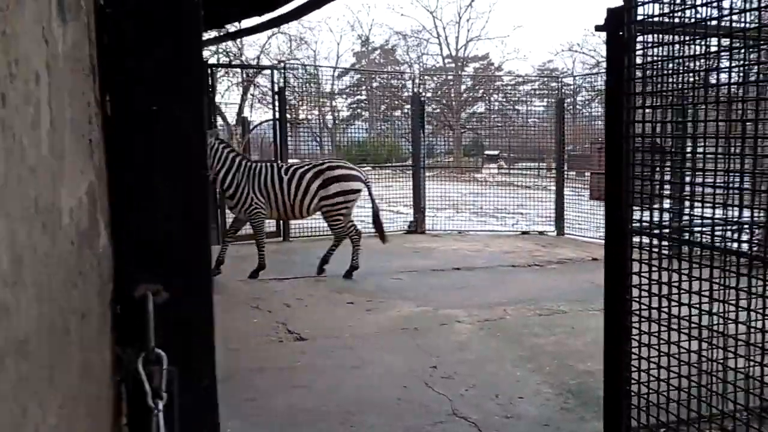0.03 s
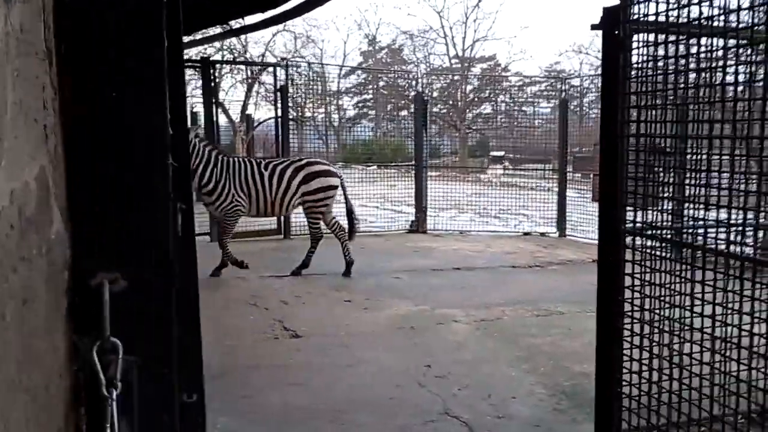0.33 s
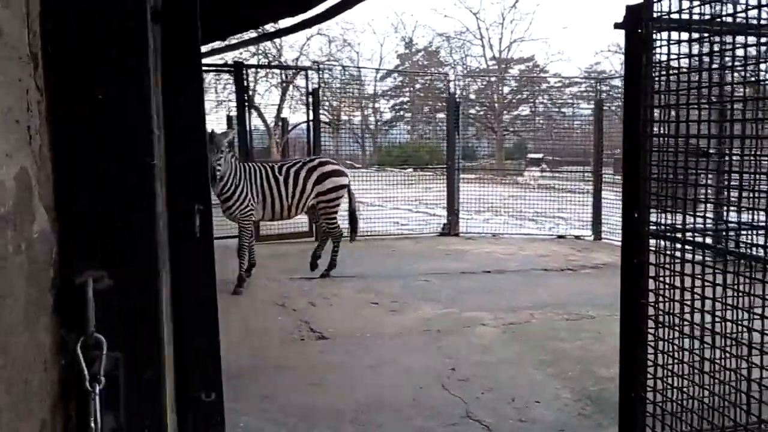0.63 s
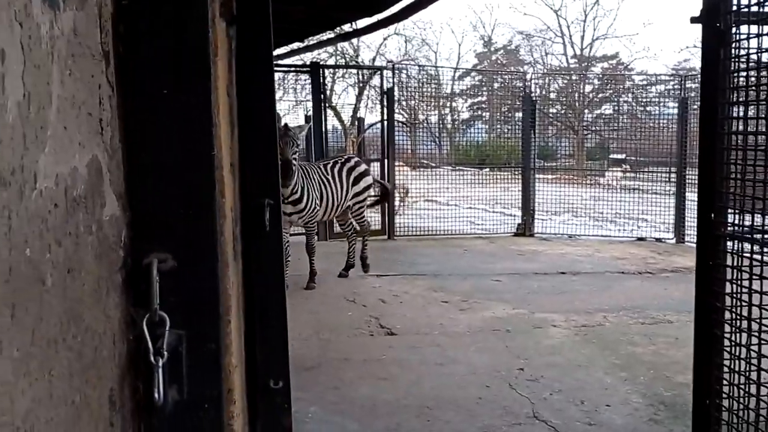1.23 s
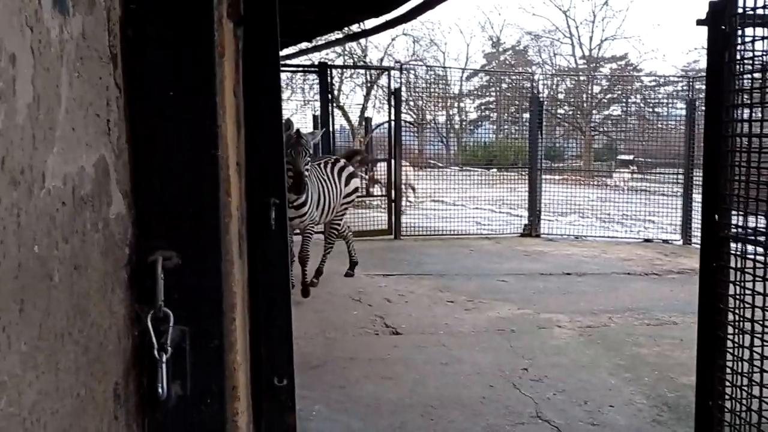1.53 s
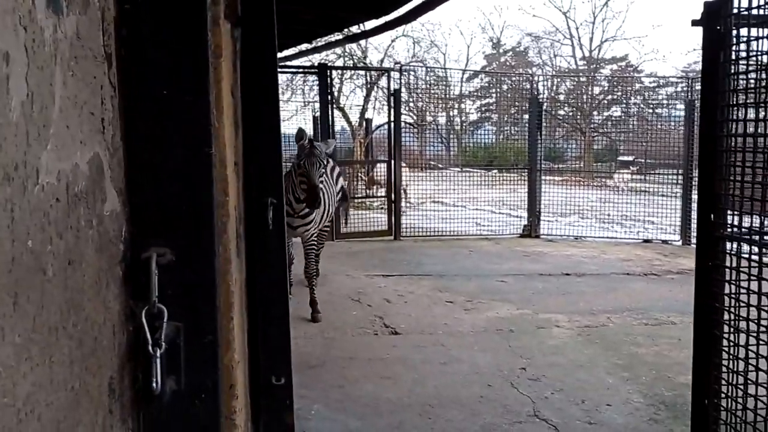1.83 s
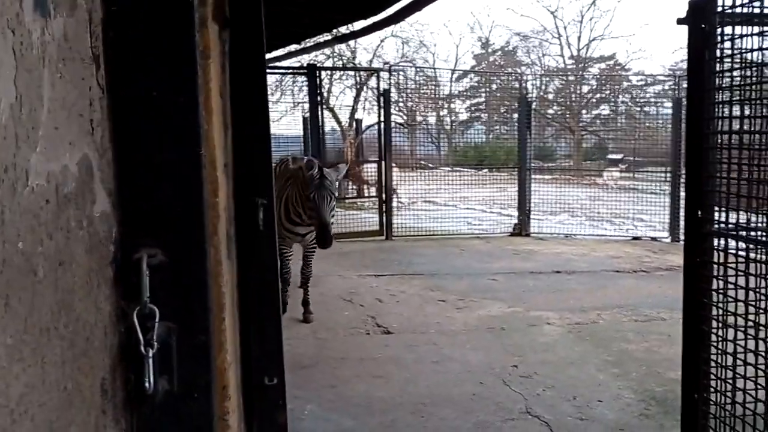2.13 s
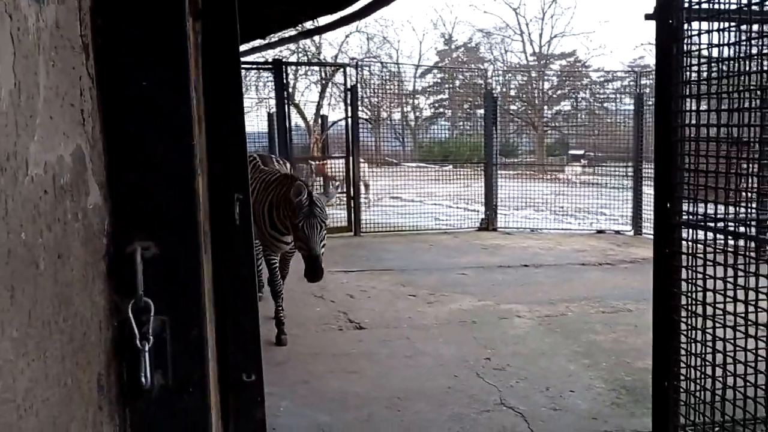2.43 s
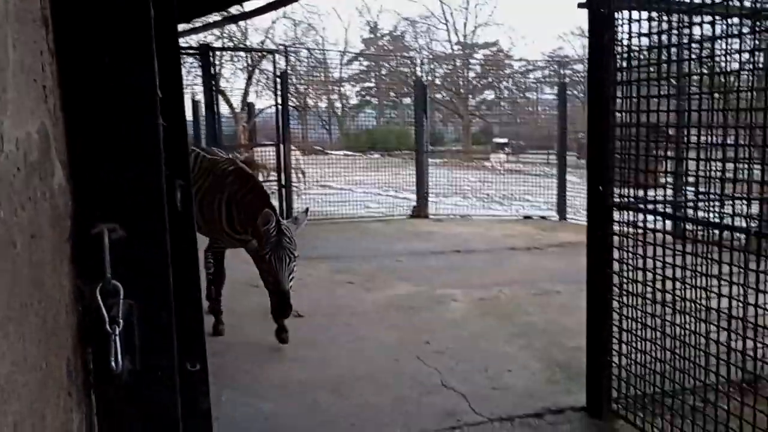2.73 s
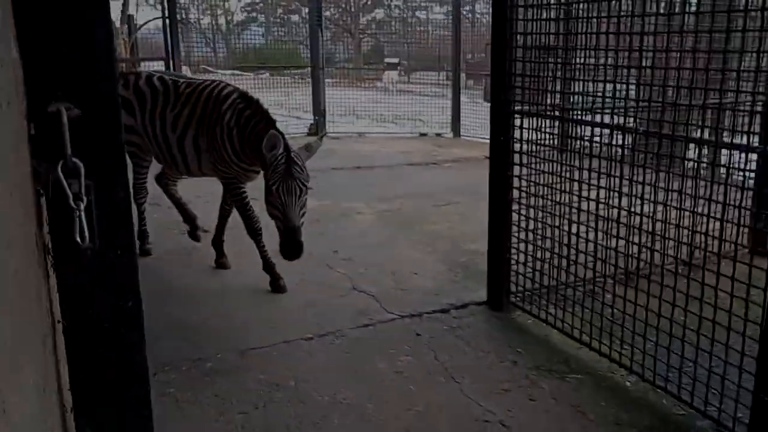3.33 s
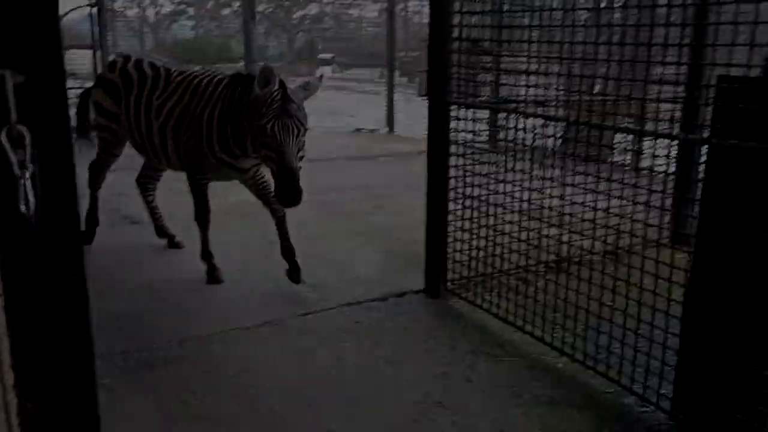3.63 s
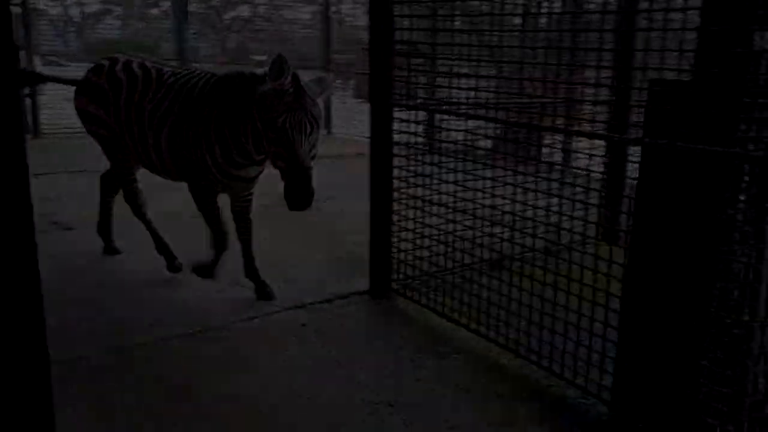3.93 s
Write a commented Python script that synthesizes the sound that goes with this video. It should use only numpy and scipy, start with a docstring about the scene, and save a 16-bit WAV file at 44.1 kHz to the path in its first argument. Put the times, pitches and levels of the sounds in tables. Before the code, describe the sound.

A zebra's hooves clop unevenly on gritty concrete, with sandy scuffs and small snaps of grit between steps. The steps are light and spaced for the first two seconds, then grow heavier from about 2.4 seconds. From 3 to 3.8 seconds they come close and fast, loudest near 3.2, booming briefly in a concrete stall. Small birds chirp faintly over a quiet outdoor hush, clearest around 2 seconds.

```python
"""A zebra's hooves clop over a gritty concrete yard and into a concrete stall, towards the microphone.
Each footfall layers a thump of weight, a hollow clop of horn and a crack of grit.
Between steps the hooves scuff and drag, rolling sand and snapping the odd stone.
The stall booms and echoes; behind it all, small birds whistle over a quiet outdoor hush."""
import sys
import numpy as np
from scipy import signal
from scipy.fft import rfft, irfft
from scipy.io import wavfile
from scipy.ndimage import uniform_filter1d

SR = 44100
rng = np.random.default_rng(int(sys.argv[2]) if len(sys.argv) > 2 else 0)


def inscribe(sig):
    """Save sig as 16-bit PCM at rate SR to the path in sys.argv[1].

    A 1-D sig is mono; a 2-D sig holds one channel per row.
    Samples are clipped to [-1, 1] before scaling.
    """
    pcm = np.round(np.clip(np.atleast_2d(sig).T, -1, 1) * 32767)
    wavfile.write(sys.argv[1], SR, pcm.astype(np.int16))


N = 176400
T = np.arange(N) / SR

# hoof hits (time [s], thump level [dB], thump pitch [Hz], thump decay [s], clop level [dB],
# clop centre [Hz], crack level [dB], direct over echo [dB])
FOOTFALLS = [ (0.154, -32, 125, 0.0034, -20, 1230, -47, -16),
             (0.162, -21, 124, 0.0047, -17, 1060, -34, 0.5), (0.296, -15, 207, 0.0025, -27.5, 456, -50, 0),
             (0.310, -20.5, 166, 0.0022, -26.5, 500, -55, -1.5),
             (0.701, -25.5, 260, 0.0021, -18.5, 1250, -49, -5.5),
             (0.719, -18.5, 180, 0.0017, -19, 990, -16.5, -1.5),
             (1.027, -35, 250, 0.0041, -22, 1300, -54, -1),
             (1.034, -24.5, 238, 0.0011, -14.5, 940, -26, -7),
             (1.616, -34, 194, 0.0021, -20, 1390, -44, -4.5), (1.865, -24, 173, 0.0023, -63, 2000, -31, -2),
             (2.187, -26.5, 157, 0.0022, -33.5, 510, -65, -13),
             (2.441, -11, 232, 0.0029, -38, 493, -43, -1.5),
             (2.452, -13.5, 197, 0.0022, -20.5, 950, -27, -1.5),
             (2.947, -7, 112, 0.0066, -36, 600, -35.5, 9.5),
             (2.962, -13.5, 253, 0.0037, -30, 1640, -20, 0.5),
             (3.063, -17.5, 144, 0.002, -44, 900, -25, -31),
             (3.226, -0.5, 230, 0.0023, -17, 910, -40, -5.5), (3.230, -11, 219, 0.0025, -14, 710, -30, 6),
             (3.240, -4.5, 149.3, 0.0076, -11, 850, -17, 0.5), (3.356, -22, 250, 0.0023, -18, 850, -32, 1),
             (3.433, -14.5, 296, 0.0019, -27, 550, -49, 5.5), (3.445, -25, 298, .003, -27, 805, -23, 3),
             (3.502, -12, 95, 0.0028, -38, 500, -38, 6), (3.517, -22, 151, 0.0033, -28, 900, -26, 11),
             (3.528, -13.5, 138, 0.001, -24.5, 885, -30, 31),
             (3.542, -9, 143, 0.0021, -19.5, 486, -24.5, 7), (3.562, -26, 114, .004, -25.5, 860, -42, -5),
             (3.582, -16.5, 430, 0.0011, -13, 1710, -15, 18),
             (3.799, -9.5, 245, 0.0012, -13, 700, -14, 3.5)]
# bright EQ of grit crushed under a hoof (frequency [Hz], gain [dB])
CRACK_EQ = [(300, -17), (1500, -2.5), (4000, 3), (7000, 4), (8300, -12), (13000, -16), (15500, -7.5)]
CRACK_DECAY_S = 0.0015
NEAR_DIRECT_DB, DULLING = 13, 0.25  # top treble loses DULLING dB per dB of direct sound below a near step


def footfalls():
    """The weight thumps, the horn clops and grit cracks; every spot has its own echo."""
    out, t = np.zeros(N), T[:SR // 2]
    for s, thump_db, thump_hz, decay_s, clop_db, clop_hz, crack_db, direct_db in FOOTFALLS:
        stall = stall_echo()
        thump = np.sin(2 * np.pi * thump_hz * t) * t * np.exp(-t / decay_s)
        clop = hoof_clop(t, clop_hz)
        dull_db = DULLING * min(direct_db - NEAR_DIRECT_DB, 0)
        crack = equalise(contact(t, CRACK_DECAY_S, CRACK_EQ), [(6000, 0), (14000, dull_db)])
        for db, layer in ((thump_db, thump), (clop_db, clop), (crack_db, crack)):
            add(out, s, undb(db) * unit(reverb(layer, stall, direct_db)))
    return out


# ringing modes of hoof horn (frequency [Hz], relative level [dB], t60 [s])
HORN_MODES = [(600, 3, 0.022), (706, -10, 0.089), (985, 8.5, 0.01), (1336, 3, 0.023), (1797, 9, 0.0087),
              (2185, 7, 0.008)]
# EQ of horn knocking on concrete (frequency [Hz], gain [dB])
KNOCK_EQ = [(100, -12), (400, 6.5), (1400, -12), (2300, 3), (3200, -10), (6000, 14), (16000, -31)]
KNOCK_DB, HORN_DB, HORN_DETUNE = 5, -4, 0.015


def hoof_clop(t, centre_hz):
    """Horn knocks on the slab and rings; a broad peak around centre_hz makes it hollow."""
    horn = 0
    for k, (hz, db, t60) in enumerate(HORN_MODES):
        detuned_hz = hz * (1 + HORN_DETUNE * rng.standard_normal())
        horn += (-1) ** k * undb(db) * ring(t, detuned_hz, t60)
    knock = contact(t, decay_s=0.00083, eq=KNOCK_EQ)
    octaves = np.arange(-4, 5)
    hollow_eq = np.c_[centre_hz * 2. ** octaves, -4.5 * octaves ** 2]  # 4.5 dB down an octave off centre
    return equalise(undb(HORN_DB) * unit(horn) + undb(KNOCK_DB) * knock, hollow_eq)


def contact(t, decay_s, eq):
    """A hard transient: one clean click with a short, rough tail."""
    force = 0.6 * unit(rng.standard_normal(len(t)) * np.exp(-t / decay_s))
    force[0] += 1
    return unit(equalise(force, eq))


# hoof drags, with levels ahead of the SCUFF_DB fader
# (peak time [s], rise [s], decay [s], sand level [dB], rasp level [dB], rub level [dB])
HOOF_DRAGS = [ (0.06, 0.29, 0.094, -80, -55.5, -63.5), (0.271, 0.083, 0.27, -57, -55, -65),
              (0.407, 0.019, 0.026, -42.5, -53.5, -97), (0.473, 0.022, 0.024, -98, -52.5, -56),
              (0.634, 0.029, 0.013, -115.5, -67, -56.5), (0.723, 0.028, 0.082, -51.5, -55, -57),
              (1.12, 0.061, 0.033, -54.5, -56.5, -79), (1.28, 0.037, 0.035, -63, -64.5, -75),
              (1.335, 0.0062, 0.017, -64, -66, -74), (1.635, 0.038, 0.045, -65.5, -57.5, -82),
              (1.707, 0.068, 0.041, -47, -54, -74), (1.865, .003, 0.034, -48.5, -54, -78),
              (1.899, 0.022, 0.014, -49, -62, -79), (1.984, 0.037, 0.079, -50, -96, -72),
              (2.283, 0.0087, 0.061, -53.5, -62, -52), (2.343, 0.028, 0.031, -46, -57, -68.5),
              (2.458, 0.013, 0.021, -49.5, -65, -64), (2.571, 0.0041, 0.016, -42, -51.5, -69),
              (2.73, 0.039, 0.033, -59, -88, -64.5), (2.829, 0.065, 0.074, -55.5, -53.5, -56),
              (2.909, 0.055, 0.064, -65, -76, -44.5), (2.959, 0.015, 0.014, -34, -44, -38.5),
              (3.04, 0.026, 0.037, -53, -62, -70), (3.072, 0.011, 0.017, -55, -59.5, -66),
              (3.15, 0.048, 0.031, -74.5, -61.5, -52), (3.248, 0.015, 0.015, -42, -41, -29.5),
              (3.38, 0.029, 0.025, -49.5, -51.5, -42.5), (3.534, 0.091, 0.014, -53, -53.5, -54),
              (3.562, 0.002, 0.004, -31, -42, -47), (3.577, 0.0063, 0.0089, -53, -66, -33.5),
              (3.71, 0.13, 0.12, -67.5, -62, -57), (3.814, .008, 0.029, -77, -50, -54),
              (3.917, 0.018, 0.0073, -61, -49, -93)]
# fine hiss of rolling sand (frequency [Hz], gain [dB])
SAND_EQ = [(500, -39), (2500, -18), (4200, -3), (5300, -7.5), (7100, 4), (8300, -8), (10500, -15.5),
           (13500, -27.5), (15300, -12.5)]
# midrange rasp of coarse grit (frequency [Hz], gain [dB])
RASP_EQ = [(200, -27), (900, -6.5), (2200, 9.5), (4300, 5.5), (7000, 5.5), (9000, -36), (16000, -42)]
# low rub of hoof on slab (frequency [Hz], gain [dB])
RUB_EQ = [(30, -41), (60, -11), (105, 10.5), (260, 1), (400, -7.5), (700, -4.5), (1300, -19.5), (4000, -33),
          (16000, -51)]
SCUFF_DB, GRAVEL_DB = -5.5, -7
RELEASE_POWER = 1.24  # above 1 the slide stops more abruptly


def scuffs():
    """A sliding hoof swells and fades, rolling sand and grit and rubbing the slab; lone stones crackle."""
    sand, rasp, rub = (grains(eq, per_s=7000) for eq in (SAND_EQ, RASP_EQ, RUB_EQ))
    gravel = grains(SAND_EQ, per_s=70)
    slide, crackle = 0, 0
    for s, rise_s, decay_s, sand_db, rasp_db, rub_db in HOOF_DRAGS:
        attack = (np.minimum(T - s, 0) / rise_s) ** 2
        release = (np.maximum(T - s, 0) / decay_s) ** RELEASE_POWER
        swell = np.exp(-attack - release)
        slide += swell * (undb(sand_db) * sand + undb(rasp_db) * rasp + undb(rub_db) * rub)
        crackle += swell * undb(sand_db + GRAVEL_DB) * gravel
    stall = stall_echo()
    return undb(SCUFF_DB) * (reverb(slide, stall, direct_db=2) + reverb(crackle, stall, direct_db=3))


def grains(eq, per_s):
    """A bed of grit clicks in clumps, most small and a few large."""
    size_db = 3.2 * np.minimum(rng.exponential(size=N), 4)
    clump_db = 2.8 * wander(per_s=130)
    clicks = undb(size_db + clump_db) * rng.choice([-1, 1], N)
    struck = rng.random(N) < per_s / SR
    return level(equalise(clicks * struck, eq), 0)


# single grains breaking (time [s], level [dB])
GRIT_SNAPS = [(1.641, -26), (1.971, -31.5), (2.566, -29), (2.581, -29), (2.607, -30), (3.939, -28)]


def grit_snaps():
    """Grit snaps under a hoof with a crisp, fairly dry tick."""
    out = np.zeros(N)
    for s, db in GRIT_SNAPS:
        snap = contact(T[:SR // 2], CRACK_DECAY_S, SAND_EQ)
        add(out, s, undb(db) * unit(reverb(snap, stall_echo(), direct_db=9)))
    return out


# boomy standing waves of the stall (frequency [Hz], level [dB], t60 [s])
STALL_MODES = [(124, -57, 0.62), (153.3, -51.5, 0.38), (254.5, -71.5, 0.33)]
# length of the stall's reverb tail (frequency [Hz], t60 [s])
STALL_DECAY = [(100, 0.18), (400, 0.23), (1500, 0.31), (5000, 0.31), (9000, 0.12), (16000, 0.13)]
ECHO_BUILD_S, BOUNCES_PER_S, BOUNCE_DB = 0.0023, 350, -7.5


def stall_echo():
    """The stall's impulse response: wall bounces in a dense tail that dies band by band, plus boom."""
    t = T[:SR // 2]
    bounces = rng.standard_normal(len(t)) * (rng.random(len(t)) < BOUNCES_PER_S / SR)
    spectrum = rfft(unit(rng.standard_normal(len(t))) + undb(BOUNCE_DB) * unit(bounces))
    hz = np.arange(len(spectrum)) * SR / len(t)
    octave = np.clip(np.log2((hz + 1) / 125), 0, 7)
    tail = 0
    for k in range(8):
        band = irfft(spectrum * np.maximum(1 - abs(octave - k), 0), len(t))
        tail += band * fade(t, on_log(125 * 2 ** k, STALL_DECAY))
    build = 1 - np.exp(-t / ECHO_BUILD_S)
    boom = sum(undb(db) * ring(t, mode_hz, t60) for mode_hz, db, t60 in STALL_MODES)
    return unit(tail * build) + boom


# bird notes (time [s], length [s], start pitch [Hz], end pitch [Hz], level [dB])
BIRD_NOTES = [(0.01, 0.016, 2850, 2770, -59), (0.80, 0.049, 7740, 7140, -61.5),
              (0.959, 0.038, 7830, 6990, -63), (1.223, 0.036, 4800, 5640, -64),
              (1.323, 0.017, 5400, 4510, -61), (1.33, 0.026, 5950, 5800, -60),
              (1.408, .05, 5880, 5790, -67.5), (1.424, 0.033, 4810, 5170, -66),
              (1.516, .06, 5790, 5530, -73.5), (1.488, 0.072, 2860, 2756, -73),
              (2.018, 0.039, 5730, 4500, -61), (2.062, 0.039, 3920, 3120, -49),
              (2.085, 0.032, 4026, 3507, -51.5), (2.137, 0.054, 2587, 2373, -56.5),
              (2.167, 0.043, 2500, 2060, -56), (2.147, 0.0396, 5150, 4300, -57),
              (2.15, 0.021, 3880, 3610, -54), (2.077, 0.015, 7730, 6610, -55),
              (2.165, 0.0274, 7470, 6900, -62.5), (2.627, 0.077, 4510, 4230, -63.5),
              (2.724, 0.076, 4480, 4160, -65), (3.163, 0.1, 4540, 4330, -65),
              (3.767, 0.024, 4400, 4500, -65)]


def birds():
    """Short gliding whistles with a slight waver, smeared by the yard."""
    out, waver = np.zeros(N), 1 + 0.012 * wander(per_s=300)
    for s, length_s, start_hz, end_hz, db in BIRD_NOTES:
        progress = np.linspace(0, 1, int(length_s * SR))
        glide_hz = start_hz + (end_hz - start_hz) * progress
        hz = glide_hz * waver[int(s * SR):][:len(progress)]
        arch = 2 * np.sqrt(2 * progress * (1 - progress))
        add(out, s, undb(db) * arch * np.sin(2 * np.pi * np.cumsum(hz) / SR))
    yard = unit(rng.standard_normal(SR) * fade(T[:SR], t60=0.39))
    return reverb(out, yard, direct_db=-6)


# bass-heavy EQ of the open air (frequency [Hz], gain [dB])
AIR_EQ = [(25, -2), (45, 8), (70, 9.5), (130, -0.5), (300, -1), (800, -6), (2000, -13), (3600, -17.5),
          (5500, -12), (7000, -16.5), (8500, -29.5), (13000, -41), (15500, -39)]
HUSH_DB, DRIFT_DB = -66.5, 0.66


def hush():
    """A quiet bed of open air; its rumble and its far hiss drift separately in level."""
    air = level(equalise(rng.standard_normal(N), AIR_EQ), HUSH_DB)
    rumble = signal.sosfilt(signal.butter(2, 1500, fs=SR, output="sos"), air)
    rumble = signal.sosfilt(signal.butter(2, 1500, fs=SR, output="sos"), rumble[::-1])[::-1]  # zero phase
    hiss = air - rumble
    return rumble * undb(DRIFT_DB * wander(per_s=4.39)) + hiss * undb(DRIFT_DB * wander(per_s=4.26))


def reverb(x, response, direct_db):
    """Dry/wet mix, with the straight path direct_db above the echo."""
    direct = undb(direct_db)
    return (direct * x + signal.fftconvolve(x, response)[:len(x)]) / np.hypot(direct, 1)


def equalise(x, points):
    """Minimum-phase EQ through (frequency [Hz], gain [dB]) points."""
    n = 4096
    hz = np.arange(n // 2 + 1) * SR / n
    cepstrum = irfft(np.log(undb(on_log(hz, points))))
    cepstrum[1:n // 2] *= 2  # folded forward, so nothing rings ahead of a hit
    cepstrum[n // 2 + 1:] = 0
    return signal.fftconvolve(x, irfft(np.exp(rfft(cepstrum))))[:len(x)]


def on_log(hz, points):
    """Read a curve along a log-frequency axis."""
    point_hz, values = np.array(points, float).T
    return np.interp(np.log(hz + 1e-9), np.log(point_hz), values)


def ring(t, hz, t60):
    """One struck mode: a dying sine."""
    return np.sin(2 * np.pi * hz * t) * fade(t, t60)


def fade(t, t60):
    """An envelope that falls 60 dB in t60 seconds."""
    return np.exp(-np.log(1000) * t / t60)


def wander(per_s):
    """Smooth random modulation with a spread of 1."""
    hold = int(SR / per_s)
    steps = np.repeat(rng.standard_normal(N // hold + 1), hold)
    smooth = uniform_filter1d(uniform_filter1d(steps, hold), hold)[:N]
    return smooth / smooth.std()


def undb(db):
    return 10 ** (np.asarray(db) / 20)


def unit(x):
    """Scale to unit energy."""
    return x / np.sqrt(np.sum(x ** 2) + 1e-18)


def level(x, db):
    """Set the RMS level."""
    return unit(x) * np.sqrt(len(x)) * undb(db)


def add(out, s, x):
    """Mix x into out at s seconds."""
    i = int(s * SR)
    out[i:i + len(x)] += x[:len(out) - i]


def scene():
    """The mono mix: hooves in front, birds and air behind."""
    return (footfalls() + grit_snaps() + scuffs() + birds() + hush())[None]


# resonances of the microphone and its case (frequency [Hz], width [Hz], added level [dB])
MIC_RESONANCES = [(6530, 220, -10), (6620, 130, -31)]
LOW_CUT_HZ, HIGH_CUT_HZ = 68, 15850


def record(dry):
    """The microphone rings a little in the treble, thins the deep bass and cuts the top."""
    ringing = sum(undb(db) * signal.lfilter(*signal.iirpeak(hz, hz / width, fs=SR), dry)
                  for hz, width, db in MIC_RESONANCES)
    thinned = signal.sosfilt(signal.butter(3, LOW_CUT_HZ, "high", fs=SR, output="sos"), dry + ringing)
    return signal.sosfilt(signal.ellip(8, .2, 70, HIGH_CUT_HZ, fs=SR, output="sos"), thinned)


dry = scene()
out = record(dry)
inscribe(out)
```